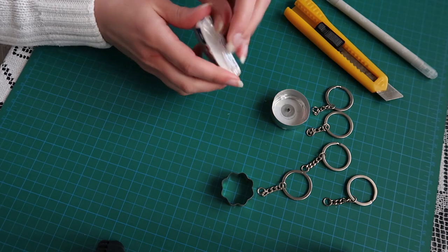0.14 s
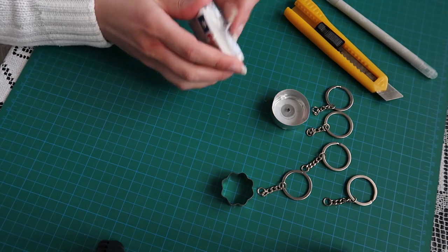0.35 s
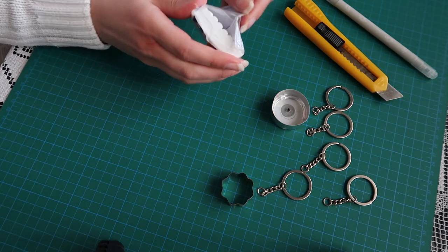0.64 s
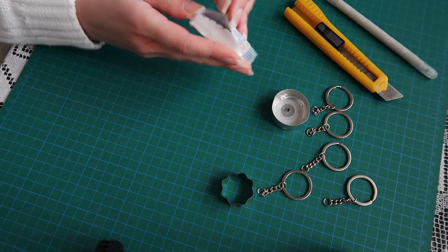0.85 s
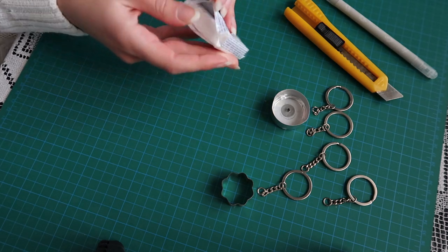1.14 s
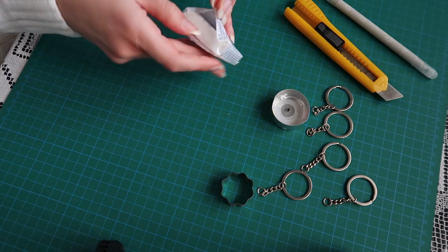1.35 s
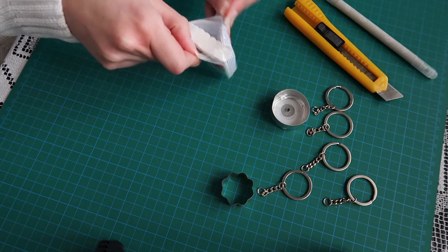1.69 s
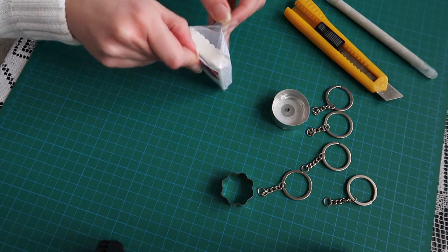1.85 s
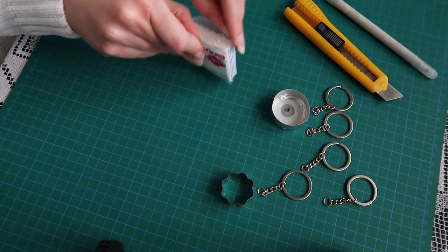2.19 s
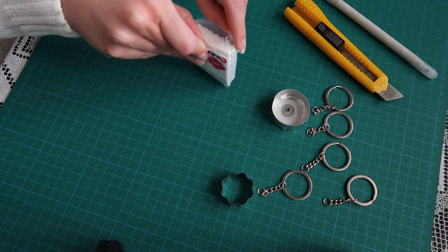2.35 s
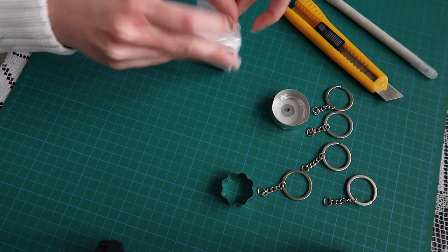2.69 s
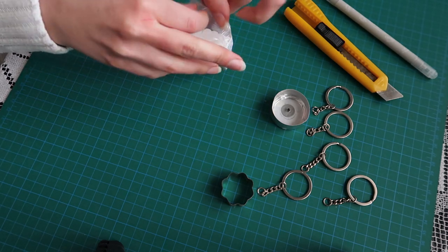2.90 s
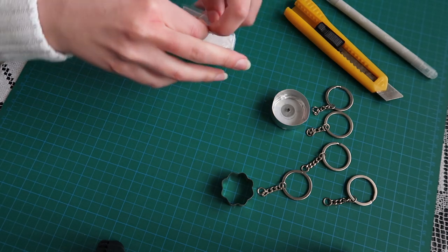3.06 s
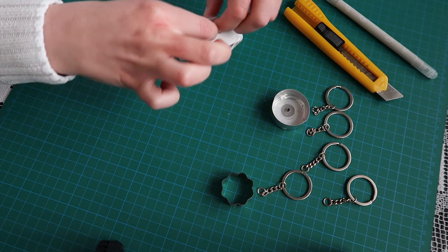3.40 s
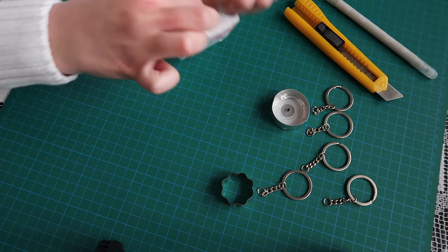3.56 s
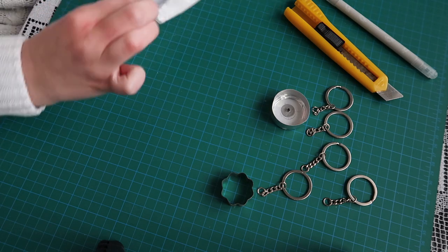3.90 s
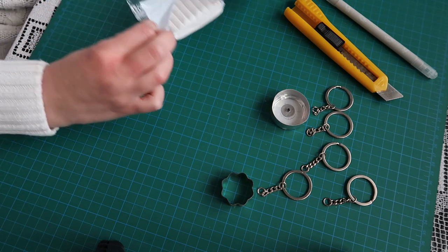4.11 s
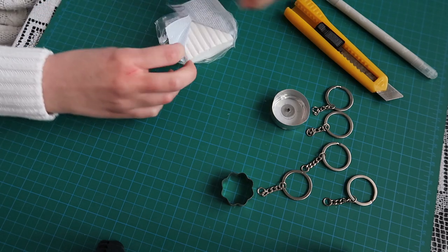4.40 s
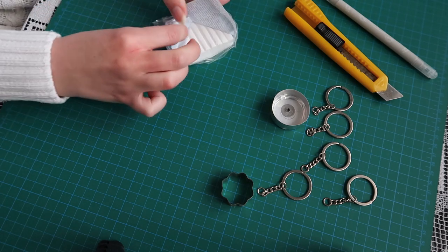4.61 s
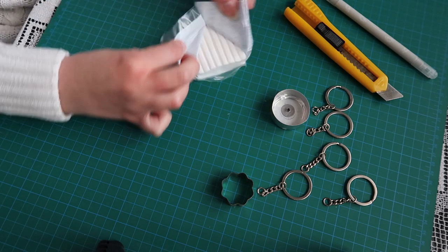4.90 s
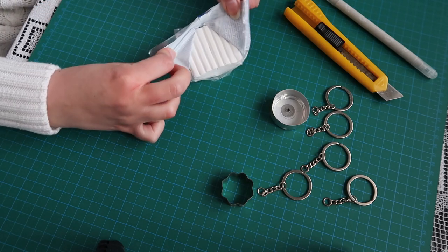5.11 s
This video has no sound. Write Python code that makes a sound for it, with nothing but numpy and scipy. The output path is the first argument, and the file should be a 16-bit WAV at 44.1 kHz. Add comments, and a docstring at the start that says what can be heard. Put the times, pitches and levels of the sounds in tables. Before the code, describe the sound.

Close stereo pickup of stiff plastic film being handled at a desk in a small, fairly dry room. A dense bright crackle in the first half second thins into scattered snaps, with stronger clusters before two seconds and around two and a half. Sparse crinkles follow, then the loudest rustling burst just before four seconds, with soft finger bumps, and looser ticks to the end over faint low rumble.

```python
"""Unwrapping clay from stiff film

A block of clay is unwrapped by hand above a desk in a small room, with a close pair of microphone ports.
Creases of stiff plastic film snap singly and in bursts: jolted noise makes a ring, a crack and a thud.
Under them runs a fine crackle of band-passed clicks, and now and then a soft bump, a short decaying sine.
Hands, desk and wall send back echoes, the room adds a tail, and shaped noise makes rumble and hiss."""
import sys
import numpy as np
from scipy import signal
from scipy.fft import rfft, irfft
from scipy.io import wavfile

SR = 44100
rng = np.random.default_rng(int(sys.argv[2]) if len(sys.argv) > 2 else 0)


def file_out(sig):
    """Save sig as 16-bit WAV at sys.argv[1]."""
    # one column per channel
    cols = np.atleast_2d(sig).T
    # limit, then scale
    lim = np.clip(cols, -1, 1)
    pcm = np.round(lim * 32767).astype(np.int16)
    wavfile.write(sys.argv[1], SR, pcm)


N = 231513

# Slow swell of distant traffic: (time [s], rumble level [dB])
TRAFFIC_SWELL = [(0, -53.5), (1.1, -51), (1.7, -52.5), (5.25, -51.5)]
# Spectrum of the rumble, alike at both ports: (frequency [Hz], relative level per Hz [dB])
RUMBLE_SPECTRUM = [(25, -19), (33, -20), (43, -4), (51, 2.5), (59, -12.5), (68, 5.5), (80, -10),
                   (118, -5.5), (150, -9.5), (330, -14), (470, -16.5), (700, -19), (2000, -24.5),
                   (6000, -35), (16000, -42.5)]
# Spectrum of the hiss, opposite at the two ports: (frequency [Hz], relative level per Hz [dB])
HISS_SPECTRUM = [(40, -16), (130, 2), (300, 6.5), (700, -1.5), (2000, -7.5), (6000, -17), (13000, -24),
                 (16000, -44)]
HISS_DB = -57.5

# Fingers squeeze or pull the film:
# (time of full strength [s], time held [s], crackle level [dB], grain pitch [Hz])
FILM_SQUEEZES = [(0, 0.034, -43, 3430), (.2, 0.11, -51.5, 3360), (0.424, 0.017, -32.5, 3430),
                 (.47, 0.032, -33, 3000), (0.503, 0.0052, -24, 2440), (.59, 0.025, -58, 2000),
                 (.77, 0.063, -48, 2520), (.94, 0.063, -53, 3000), (1.17, 0.14, -57, 2390),
                 (1.383, 0.0083, -45.5, 3000), (1.538, 0.0075, -51, 3000), (1.68, 0.022, -41.5, 2000),
                 (1.805, 0.028, -38.5, 2580), (1.928, 0.011, -39, 2250), (2.18, 0.081, -60.5, 1810),
                 (2.29, 0.13, -62.5, 1600), (2.5, 0.025, -47.5, 1950), (2.72, .02, -46, 1920),
                 (2.85, 0.04, -46.5, 2410), (2.96, 0.082, -55, 1920), (3.1, 0.046, -45.5, 1930),
                 (3.21, .012, -39, 2350), (3.27, 0.047, -42.5, 2180), (3.44, 0.028, -48.5, 2220),
                 (3.531, 0.007, -42, 2000), (3.603, 0.0046, -34.5, 3430), (3.85, .02, -42.5, 2300),
                 (3.887, .03, -24, 2000), (3.94, 0.067, -29, 2090), (4.08, 0.061, -47.5, 1706),
                 (4.332, 0.0088, -39, 2240), (4.725, 0.057, -47.5, 1760), (4.83, 0.072, -61, 1810),
                 (4.93, 0.027, -41, 2000), (4.975, .03, -37, 1700), (5.156, 0.018, -42, 1740),
                 (5.22, .03, -57, 1630)]
RISE_DB_PER_S, FALL_DB_PER_S = 998, 400
REST_DB, REST_HZ = -76.5, 2300  # crackle of the film merely held
GRAINS_PER_S, GRAIN_SPREAD_DB = 1300, 4.5
GRAIN_WIDTH, GRAIN_OCTAVES = 1.254, 0.85  # band edge over centre; scatter of pitch [octaves]

# Creases that snap loudly: (time [s], ring pitch [Hz], ring level [dB], crack level [dB], thud level [dB]);
# each level spread over 30 samples (0.7 ms), the ring's before its last band-pass
LOUD_SNAPS = [(0.0094, 4270, -22.5, -23, -38), (0.029, 2280, -30, -32, -46),
              (0.0462, 4600, -33, -24.5, -60), (0.0506, 2740, -20.5, -46, -34),
              (0.1015, 2920, -20.5, -29, -45), (0.154, 2730, -33.5, -41, -45),
              (0.1773, 3560, -29.5, -53, -44), (0.2105, 2940, -32, -44, -43), (0.2202, 3000, -27, -35, -57),
              (0.249, 3400, -13.5, -34, -32), (0.41, 3320, -21, -39, -44), (0.4223, 4800, -16, -46, -40),
              (0.4312, 4220, -29, -32, -45), (0.4482, 3050, -14.5, -32, -46), (0.458, 3840, -31, -31, -50),
              (0.4627, 3340, -8.5, -30, -31), (0.4745, 2420, -11.5, -17.5, -37),
              (0.4892, 4900, -21, -29, -40), (0.4945, 1950, -13, -24, -24), (0.501, 2500, -10, -12, -43),
              (0.5043, 3340, -11.5, -24, -35), (0.5355, 1230, -14, -36, -39),
              (0.752, 5210, -34.5, -36, -62), (0.7647, 3000, -18.5, -29, -36),
              (0.77, 3800, -24.5, -28.5, -28.5), (0.7941, 2510, -31, -40, -44),
              (0.8354, 1120, -40, -46, -26.5), (0.898, 3850, -24, -28.5, -40),
              (0.9216, 2200, -29.5, -30, -29), (0.952, 4120, -29, -37, -47),
              (0.9756, 1920, -19, -21.5, -34.5), (1.0103, 3010, -34, -54, -58),
              (1.0261, 3840, -16, -37, -46), (1.2158, 1340, -32, -51, -56), (1.2263, 2840, -30, -63, -45),
              (1.2335, 6100, -20, -31, -39), (1.2377, 2600, -22, -53, -61), (1.3611, 4260, -20.5, -26, -63),
              (1.3688, 1570, -22.5, -30, -53), (1.3868, 2690, -26.5, -47, -40),
              (1.397, 4510, -33.5, -41, -48), (1.5113, 1980, -38.5, -60, -43),
              (1.5496, 3500, -35, -48, -46), (1.6355, 1860, -25.5, -45, -57), (1.6647, 2090, -23, -51, -62),
              (1.673, 2330, -28, -31, -53), (1.6854, 3040, -20, -47, -52),
              (1.6894, 1550, -12.5, -23.5, -25), (1.7168, 2190, -8, -11.5, -34),
              (1.7682, 2000, -25, -51, -61), (1.7881, 2170, -10, -19.5, -27), (1.7937, 4500, -19, -28, -53),
              (1.8348, 2000, -31, -51, -40), (1.9307, 1890, -26, -35, -40),
              (1.956, 2280, -14, -34.5, -32.5), (2.1681, 1880, -30, -69, -37),
              (2.229, 2680, -36.5, -41, -48), (2.295, 1530, -41, -53, -55), (2.3153, 2580, -47, -47, -49),
              (2.3648, 1470, -34, -71, -62), (2.4698, 2040, -24, -33, -47), (2.4871, 1510, -32, -51, -36),
              (2.506, 1930, -11, -22, -28.5), (2.5173, 1950, -15, -17, -25), (2.5323, 3860, -22, -43, -43),
              (2.5474, 2480, -33, -33, -49), (2.6573, 2420, -28, -31.5, -53), (2.6804, 2140, -17, -23, -59),
              (2.6875, 1940, -22.5, -23.5, -51), (2.7241, 1560, -26.5, -46, -51),
              (2.7298, 1870, -20.5, -27.5, -36), (2.7355, 1370, -27, -41, -46), (2.77, 2860, -34, -38, -64),
              (2.8177, 1550, -29.5, -41, -39), (2.834, 2550, -28, -36, -36), (2.8388, 2000, -28, -34, -39),
              (2.8509, 2510, -19, -23.5, -36), (2.8956, 1820, -26, -43, -36), (2.974, 2340, -39, -62, -52),
              (2.9872, 1800, -35, -49, -54), (3.0899, 1840, -25, -39.5, -57), (3.0981, 2600, -27, -55, -51),
              (3.1221, 1760, -23.5, -48, -49), (3.138, 2000, -29, -56, -37), (3.2094, 1770, -27, -40, -49),
              (3.2179, 1820, -23.5, -42, -48), (3.2554, 2340, -10, -25, -31),
              (3.2706, 2850, -20, -24, -23.5), (3.2869, 1350, -18.5, -45, -34),
              (3.4078, 4330, -21, -37, -35.5), (3.4423, 2160, -25.5, -37, -36),
              (3.4893, 1030, -30.5, -46, -31.5), (3.5252, 2580, -26, -37, -34),
              (3.5333, 1840, -23, -55, -50), (3.5675, 2180, -27.5, -61, -41), (3.578, 4800, -50, -22, -33),
              (3.5899, 2700, -17, -41, -49), (3.6034, 2350, -21, -20, -48), (3.6834, 1670, -40, -60, -35.5),
              (3.6934, 3570, -33.5, -48, -35.5), (3.76, 1220, -39, -71, -38.5),
              (3.7759, 1560, -32, -69, -48), (3.7862, 5040, -23, -38, -62), (3.8082, 1720, -27.5, -52, -43),
              (3.823, 1700, -25, -60, -35), (3.8281, 3600, -16, -21.5, -36),
              (3.8427, 2300, -13.5, -42, -47), (3.8529, 2440, -22.5, -22.5, -39),
              (3.8755, 2070, -25, -24, -31), (3.8864, 1250, -17, -30, -22), (3.8926, 2570, -10.5, -20, -43),
              (3.8999, 1640, -24, -39, -31), (3.9202, 2420, -17, -21, -33),
              (3.931, 2390, -11, -13.5, -16.5), (3.9351, 1870, -11.5, -34, -36),
              (3.943, 3200, -12, -20, -46), (3.9533, 1730, -8.5, -17, -17), (3.9742, 2090, -12, -22, -23.5),
              (3.9813, 3380, -17, -35, -16), (3.9655, 3000, -16, -28, -33), (3.9896, 2400, -24, -18, -27),
              (3.9957, 3140, -30, -30, -31), (4.0112, 2010, -13.5, -23, -30),
              (4.0197, 2250, -17.5, -27, -25), (4.0926, 1220, -24.5, -43, -48),
              (4.1222, 1550, -25, -36, -27), (4.1457, 3200, -35, -33, -59), (4.1641, 2000, -39, -34, -61),
              (4.2076, 1760, -34, -61, -41), (4.2433, 3030, -35.5, -39, -54), (4.2897, 1870, -30, -40, -52),
              (4.32, 2000, -21.5, -38, -30), (4.3246, 1540, -27.5, -46, -34), (4.3397, 3430, -24, -30, -57),
              (4.3706, 1520, -39, -33.5, -27.5), (4.4576, 2360, -48, -45, -43),
              (4.5456, 1560, -66, -46.5, -62), (4.5769, 4500, -44, -42, -63), (4.6652, 1340, -47, -46, -29),
              (4.6696, 1010, -57, -38, -23.5), (4.678, 2230, -34.5, -37.5, -45),
              (4.7123, 1020, -41, -58, -38), (4.7183, 2200, -29, -33, -32.5),
              (4.723, 1380, -26.5, -52, -32), (4.735, 4600, -32.5, -31, -44), (4.8094, 3300, -26, -23, -28),
              (4.8138, 1530, -26, -47, -45), (4.8283, 1140, -30, -53, -32), (4.8622, 3300, -28, -36, -58),
              (4.87, 1810, -27.5, -63, -30), (4.8921, 2300, -10.5, -22.5, -34),
              (4.958, 1510, -20.5, -25, -27.5), (4.9686, 1940, -21.5, -39, -52),
              (4.98, 2570, -31, -45, -23), (4.9958, 1660, -29, -34, -31), (5.0118, 2080, -46, -26, -32),
              (5.033, 2400, -24.5, -36, -32), (5.0442, 2200, -17, -27, -42),
              (5.1576, 1300, -29, -44.5, -26.5), (5.1598, 1930, -19, -30, -63),
              (5.1654, 1470, -13.5, -25, -19), (5.1811, 2120, -18.5, -49, -56)]
RING_CYCLES, RING_OCTAVES = 3.27, 1.322  # cycles for the rattle to fade by 1/e; width of its band
CRACK_S, CRACK_HZ = 0.0008, 5200  # fade by 1/e; lower edge of the band
THUD_S, THUD_LOW_HZ, THUD_HIGH_HZ = 0.0021, 419, 775
LEAD = 2.8  # strength of the first jolt of a snap against the rattle after it
# Lesser creases snap at random, the louder the harder the film is worked
LESSER_PER_S = 22
USUAL_DB, LESSER_DB = -55, -40  # a usual crackle level, and the mean ring level there
LESSER_FOLLOWS, LESSER_SPREAD_DB = 0.43, 4  # share of the crackle's swing; scatter of level
LESSER_CRACK_DB, LESSER_THUD_DB, LESSER_OCTAVES = -21.5, -11, 0.44  # against the ring; scatter of pitch

# Early reflections off hands, desk and wall: (delay [s], level [dB])
EARLY_ECHOES = [(.001, -18), (.0022, -23.5), (.0033, -13), (0.013, -18.5)]
# Dying tail of the room: (frequency [Hz], 60 dB decay time [s], gain [dB])
ROOM_DECAY = [(276, 0.21, -16.5), (710, 0.24, -10), (1450, 0.2, -4.5), (3000, 0.27, -8.5), (6000, 0.21, -5),
              (12100, 0.13, -4.5)]
# Low resonances of the room: (frequency [Hz], starting level before the onset [dB], 60 dB decay time [s])
LOW_MODES = [(397.3, -59, 0.46), (482.1, -48, 0.21), (804, -52, 0.15), (1950, -43, 0.11)]
ROOM_ONSET_S = 0.0016

# Soft bumps of fingers on the block: (time [s], pitch [Hz], gain [dB])
FINGER_BUMPS = [(0.92, 254, -42), (3.878, 173, -34), (3.95, 190, -28), (4.12, 253, -41.5), (4.96, 112, -34),
                (5.027, 114, -31)]
BUMP_CYCLES = 1.21  # cycles to the fullest swing

# Gain of the difference between the ports: (frequency [Hz], direct gain [dB], room gain [dB])
PORT_DIFFERENCE = [(300, -25, -3), (1010, -38, -43), (2000, -27.5, -20), (4000, -10.5, -6), (7700, -9, 1.5),
                   (14000, -6, 3)]
ROLLOFF_HZ, CUTOFF_HZ = 12400, 17100
HEADROOM = 1.05  # ceiling of the rounded peaks, as amplitude


def amp(db):
    """Gain of a level in dB."""
    return 10 ** (np.asarray(db) / 20)


def rms_one(x):
    """Scales to rms 1."""
    return x / np.sqrt(np.mean(x ** 2) + 1e-20)


def at_hz(hz, knots_hz, values):
    """Reads a spectrum on a log-frequency axis."""
    return np.interp(np.log(hz + 1), np.log(knots_hz), values)


def colour(x, knots_hz, db):
    """Shapes a signal by a spectrum in dB."""
    size = x.shape[-1]
    hz = np.arange(size // 2 + 1) * SR / size
    return irfft(rfft(x) * amp(at_hz(hz, knots_hz, db)), size)


def band(x, low_hz, high_hz):
    """Causal band-pass."""
    edges = np.clip([low_hz, high_hz], 20, SR / 2.1)
    return signal.sosfilt(signal.butter(2, edges, "band", fs=SR, output="sos"), x)


def background():
    """Shaped noise: rumble alike at both ports, hiss opposite at them; rows = sum, difference."""
    rumble = rms_one(colour(rng.standard_normal(N), *np.transpose(RUMBLE_SPECTRUM)))
    hiss = rms_one(colour(rng.standard_normal(N), *np.transpose(HISS_SPECTRUM)))
    swell = amp(np.interp(np.arange(N) / SR, *np.transpose(TRAFFIC_SWELL)))
    return np.array([swell * rumble, amp(HISS_DB) * hiss])


def handling():
    """Times, crackle level in dB and grain pitch: squeezes rise, hold and fall, their powers adding."""
    t = np.arange(0, N + 64, 64) / SR
    s, held, db, hz = np.transpose(FILM_SQUEEZES)[:, :, None]
    rise_db = RISE_DB_PER_S * np.maximum(s - t, 0)
    fall_db = FALL_DB_PER_S * np.maximum(t - s - held, 0)
    power = amp(db - rise_db - fall_db) ** 2
    rest_power = amp(REST_DB) ** 2
    total = power.sum(axis=0) + rest_power
    # the stronger squeeze dominates the pitch
    log_pitch = ((power * np.log(hz)).sum(axis=0) + rest_power * np.log(REST_HZ)) / total
    return t, 10 * np.log10(total), np.exp(log_pitch)


def crackle():
    """Tiny random snaps of uneven size, each a short blip at a pitch scattered round the grain pitch."""
    s, level_db, centre_hz = handling()
    t = np.arange(N) / SR
    born = rng.random(N) < GRAINS_PER_S / SR
    size_db = GRAIN_SPREAD_DB * np.minimum(rng.exponential(1, N), 3)
    grains = born * amp(size_db) * rng.choice([-1, 1], (2, N))
    # each grain goes to one of a bank of narrow bands
    pitches = np.geomspace(400, 14000, 20)
    wanted = np.interp(t, s, centre_hz) * 2 ** (GRAIN_OCTAVES * rng.standard_normal(N))
    dealt = np.clip(np.searchsorted(pitches, wanted), 0, len(pitches) - 1)
    out = np.zeros((2, N))
    for k, hz in enumerate(pitches):
        blips = band(grains * (dealt == k) + 1e-18, hz / GRAIN_WIDTH, hz * GRAIN_WIDTH)
        out += blips / np.sqrt(hz)  # evens out the energy of blips of different pitch
    return amp(np.interp(t, s, level_db)) * rms_one(out)


def puff(noise, fade_s, low_hz, high_hz, db):
    """A jolt and a dying rattle in a band, with the energy of 30 samples at its level."""
    jolt = LEAD * np.sign(noise[:, :1])
    noise = np.concatenate([jolt, noise[:, 1:]], axis=1)
    fade = np.exp(-np.arange(noise.shape[-1]) / (fade_s * SR))
    x = band(noise * fade, low_hz, high_hz)
    return amp(db) * x * np.sqrt(30 / np.sum(x ** 2, axis=-1, keepdims=True))


def lesser_snaps():
    """Rows like those of the loud snaps, at random moments, following level and pitch of the crackle."""
    t, level_db, centre_hz = handling()
    count = int(LESSER_PER_S * N / SR)
    s = rng.uniform(0, N / SR, count)
    chance = rng.standard_normal((count, 4))
    swing_db = np.interp(s, t, level_db) - USUAL_DB
    ring_db = LESSER_DB + LESSER_FOLLOWS * swing_db + LESSER_SPREAD_DB * chance[:, 0]
    crack_db = ring_db + LESSER_CRACK_DB + LESSER_SPREAD_DB * chance[:, 1]
    thud_db = ring_db + LESSER_THUD_DB + LESSER_SPREAD_DB * chance[:, 2]
    hz = np.interp(s, t, centre_hz) * 2 ** (LESSER_OCTAVES * chance[:, 3])
    return list(zip(s, hz, ring_db, crack_db, thud_db))


def snaps():
    """Each crease buckles: a few cycles at its pitch, a bright crack, a thud in the clay; sum, difference."""
    size = 1024
    out = np.zeros((2, N + size))
    rows = lesser_snaps() + list(LOUD_SNAPS)
    noise = rng.standard_normal((len(rows), 3, 2, size))
    half = 2 ** (RING_OCTAVES / 2)
    for (s, hz, ring_db, crack_db, thud_db), (ring_noise, crack_noise, thud_noise) in zip(rows, noise):
        start = max(round(s * SR) - 4, 0)
        ring = puff(ring_noise, RING_CYCLES / hz, hz / half, hz * half, ring_db)
        ring = band(ring, hz / half ** 2, hz * half ** 2)  # clears away what lies far from the pitch
        crack = puff(crack_noise, CRACK_S, CRACK_HZ, CUTOFF_HZ, crack_db)
        thud = puff(thud_noise, THUD_S, THUD_LOW_HZ, THUD_HIGH_HZ, thud_db)
        out[:, start:start + size] += ring + crack + thud
    return out[:, :N]


def early(x):
    """Adds the first few reflections as delayed, weaker copies."""
    out = x.copy()
    for s, db in EARLY_ECHOES:
        lag = round(s * SR)
        out[:, lag:] += amp(db) * x[:, :-lag]
    return out


def room_response():
    """Noise that dies band by band and a few low modes, after a soft onset; rows = sum, difference."""
    t = np.arange(SR // 2) / SR
    knots_hz, t60s, gains_db = np.transpose(ROOM_DECAY)
    tail = np.zeros((2, len(t)))
    edges = 200 * 2 ** np.arange(0, 6.6, 0.5)  # half-octave bands
    for low, high in zip(edges, edges[1:]):
        hz = np.sqrt(low * high)
        t60 = at_hz(hz, knots_hz, t60s)
        fading = amp(-60 * t / t60) * np.sqrt(2 * np.log(1000) / (t60 * SR))  # unit energy
        noise = band(rng.standard_normal((2, len(t))), low, high)
        tail += amp(at_hz(hz, knots_hz, gains_db)) * fading * noise
    for hz, db, t60 in LOW_MODES:
        tail[0] += amp(db - 60 * t / t60) * np.sin(2 * np.pi * hz * t)
    return tail * (1 - np.exp(-(t / ROOM_ONSET_S) ** 2))


def bumps():
    """A soft contact swells and dies within a few cycles; rows = sum, difference."""
    out = np.zeros((2, N))
    t = np.arange(N) / SR
    for s, hz, db in FINGER_BUMPS:
        cycles = np.maximum(t - s, 0) * hz
        out += amp(db) * cycles * np.exp(-cycles / BUMP_CYCLES) * np.sin(2 * np.pi * cycles)
    return out


def scene():
    """Film and clay in the room, picked up as sum and difference of two close ports."""
    film = snaps() + crackle() + bumps()
    direct = early(film)
    wet = signal.fftconvolve(film[:1], room_response(), axes=1)[:, :N]
    knots_hz, direct_db, room_db = np.transpose(PORT_DIFFERENCE)
    # close ports differ little at long wavelengths
    side = colour(direct[1], knots_hz, direct_db) + colour(wet[1], knots_hz, room_db)
    mid, side = np.array([direct[0] + wet[0], side]) + background()
    return np.array([mid + side, mid - side])


def record(dry):
    """The treble rolls off, peaks are rounded, the top is cut."""
    soft = signal.sosfilt(signal.butter(2, ROLLOFF_HZ, fs=SR, output="sos"), dry)
    soft = HEADROOM * np.tanh(soft / HEADROOM)
    return signal.sosfilt(signal.cheby2(14, 90, CUTOFF_HZ, fs=SR, output="sos"), soft)


dry = scene()
out = record(dry)
file_out(out)
```